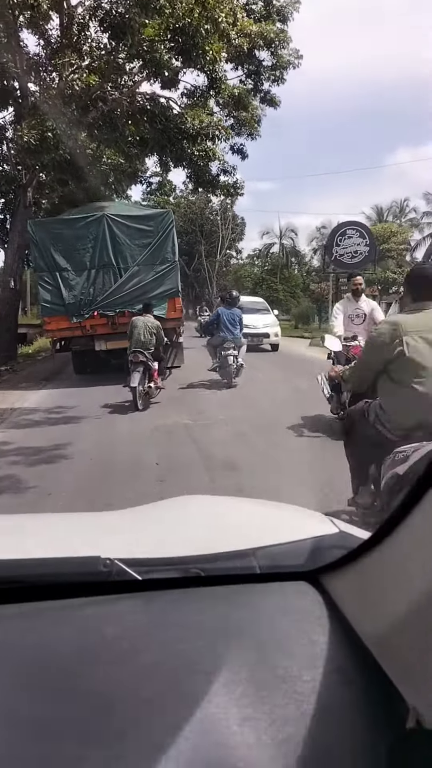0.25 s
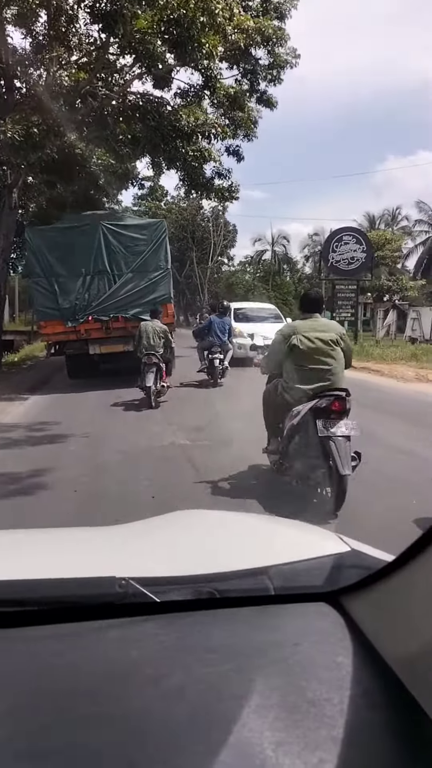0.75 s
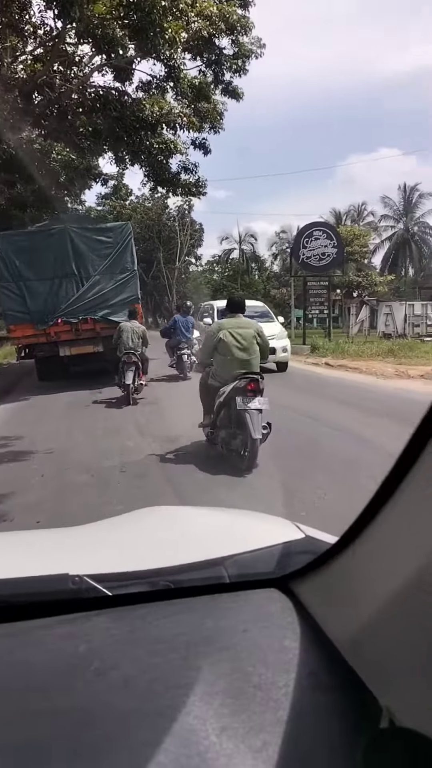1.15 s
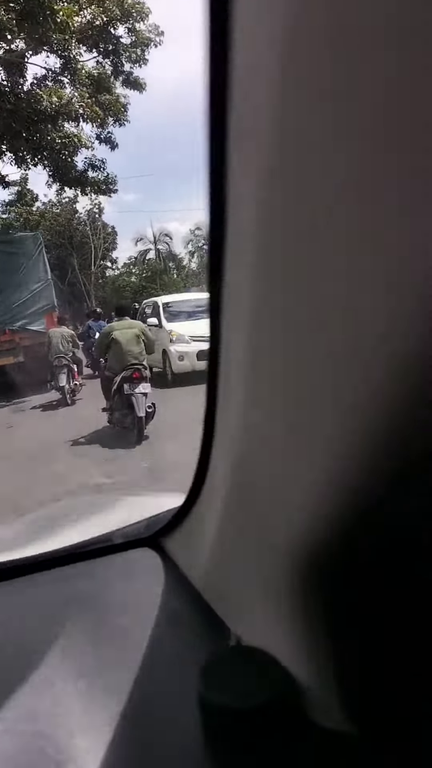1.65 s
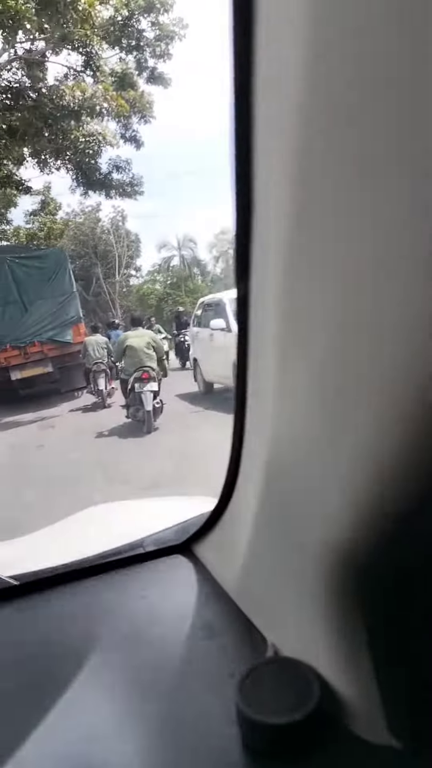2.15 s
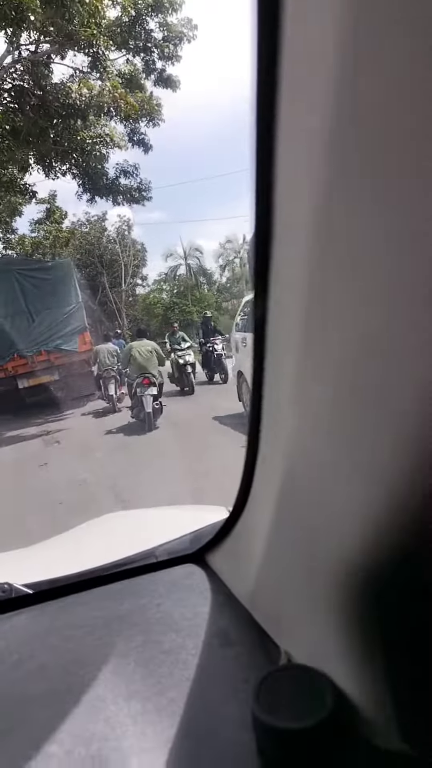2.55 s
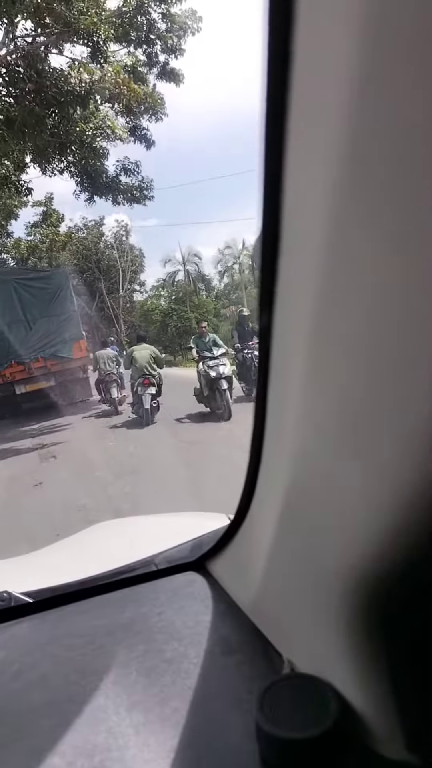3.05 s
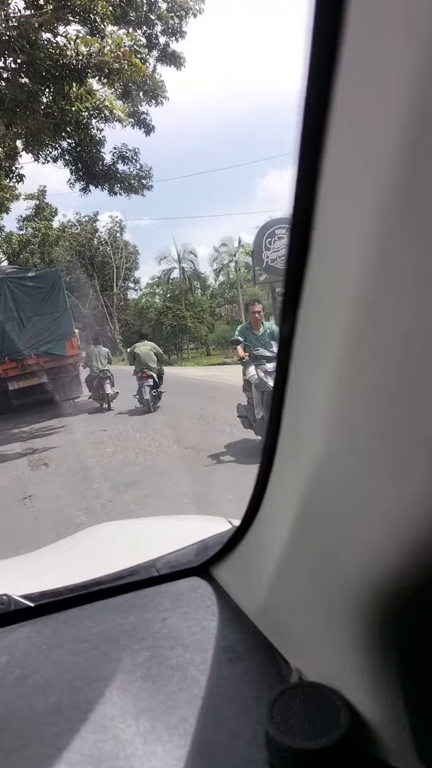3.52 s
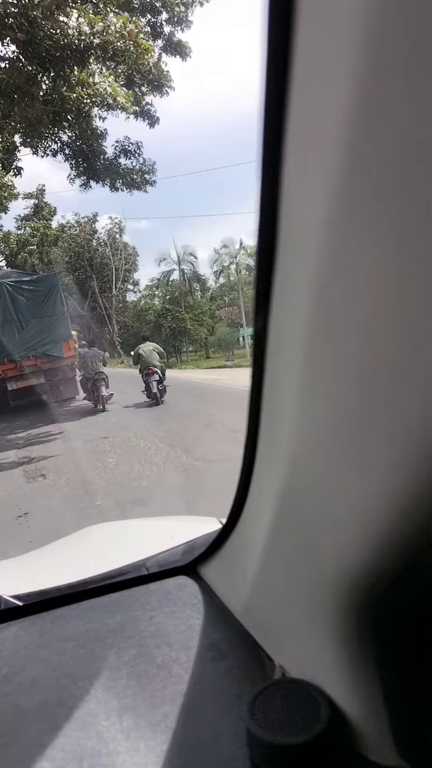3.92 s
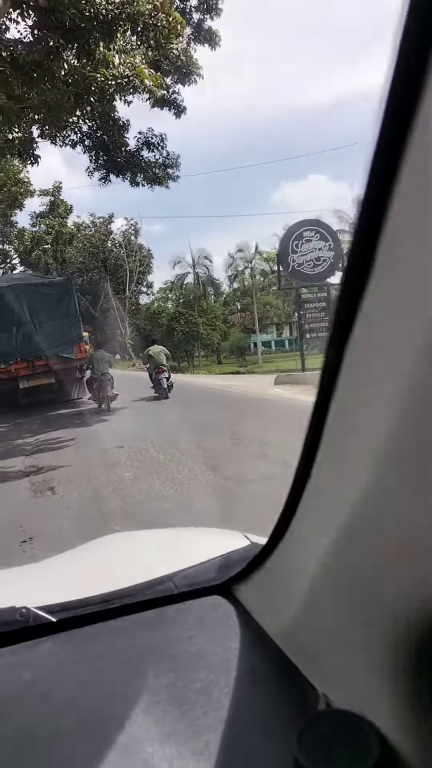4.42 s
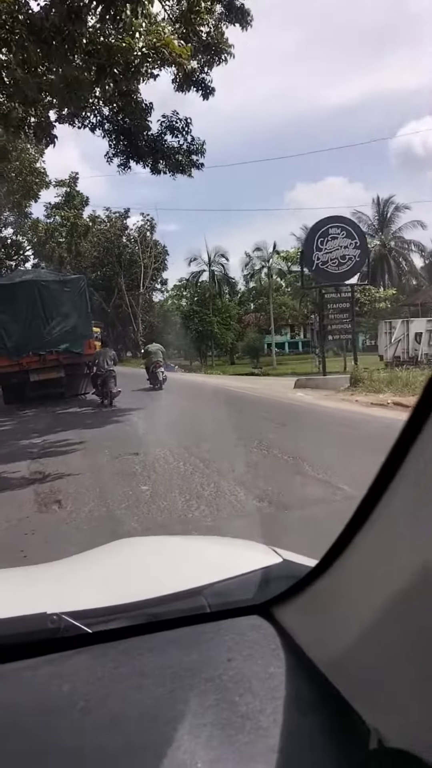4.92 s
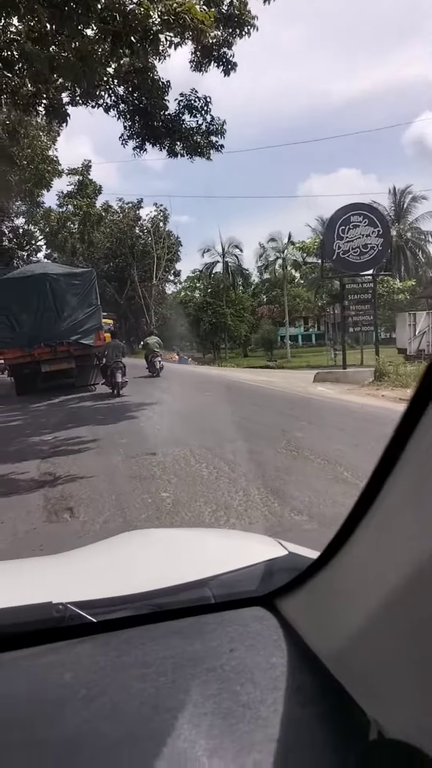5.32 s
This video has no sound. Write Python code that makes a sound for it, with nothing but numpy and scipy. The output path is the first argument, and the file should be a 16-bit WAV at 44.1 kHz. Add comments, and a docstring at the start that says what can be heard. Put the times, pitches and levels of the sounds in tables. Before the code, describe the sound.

Muffled engine throbbing and road rumble fill a car cabin, with a scooter's raspy pass and several dry plastic knocks.

```python
"""Slow traffic from the front seat of a closed car

A single-cylinder motorcycle throbs as summed firing harmonics and rasps as modes struck by each firing;
a scooter overtakes with a faster rasp. Gliding sines make brief hums and whines, filtered noise makes
rumble, tyres and vents, filtered impulses make plastic trim tick and knock close to the microphone,
and a few decaying partials make a thin metallic ring at the start."""
import sys
import numpy as np
from scipy import signal
from scipy.fft import rfft, irfft, next_fast_len
from scipy.io import wavfile
from scipy.ndimage import uniform_filter1d

SR = 44100
rng = np.random.default_rng(int(sys.argv[2]) if len(sys.argv) > 2 else 0)


def wrap_up_sound(samples):
    """Save the sound to the file named by the first command line argument, as 16-bit audio."""
    columns = np.atleast_2d(samples).T
    # keep every value between -1 and 1, then stretch to whole-number steps
    tamed = np.clip(columns, -1, 1)
    steps = np.round(tamed * 32767).astype(np.int16)
    wavfile.write(sys.argv[1], SR, steps)


N = 245637
TIME = np.arange(N) / SR


def motorcycle():
    """Periodic excitation: one firing rate drives both the low throb and the exhaust rasp."""
    # engine speed: [t/s, firing rate f/Hz]
    firing_rate = [(0.0, 17.18), (0.52, 16.82), (1.22, 23.54), (1.57, 23.98), (1.74, 23.53), (2.09, 20.39),
                   (2.44, 19.79), (2.78, 21.04), (3.13, 22.04), (3.66, 21.48), (3.83, 22.73), (4.35, 22.04),
                   (5.05, 24.83), (5.57, 26.17)]
    # resonances of the rasp: [f/Hz, width/Hz, relative level/dB]
    rasp_modes = [(1601, 86, 0.5), (2100, 400, -21), (2616, 260, 8.5), (3210, 1100, 4.5), (3780, 690, 11.5),
                  (4140, 270, 3), (4750, 250, -7), (5600, 350, -16.5), (6140, 400, -20)]
    # rasp swells: [peak t/s, level/dB, rise/(dB/s), fall/(dB/s), smooth hiss level/dB, treble edge f/Hz]
    rasp_swells = [(4.521, -49.5, 30.5, 24.5, 4, 5440), (5.2, -45.5, 33, 65.5, -6, 5820)]
    rate = curve(firing_rate)
    turns = cycles(rate, first_turn=.09)
    out = boom(rate, turns)
    for peak_s, db, rise, fall, hiss_db, top_hz in rasp_swells:
        exhaust = rasp(turns, rasp_modes, rise_s=.007, detune=.7, scatter_db=2.5,
                       puff_db=-1, hiss_db=hiss_db, top_hz=top_hz)
        out = out + swell(peak_s, db, rise, fall) * exhaust
    return out


def boom(rate, turns):
    """Fourier synthesis: firing harmonics add up to thumps that ring the cabin, under looser overtones."""
    # level of the low harmonics before standing waves lift them: [t/s, level/dB]
    boom_level = [(0, -34.5), (.9, -30.5), (1.3, -24), (1.8, -22), (2.55, -25.5), (2.9, -33), (3.12, -27),
                  (3.5, -35), (4.5, -34), (4.85, -26.5), (5.0, -35), (5.3, -30.5), (5.57, -45.5)]
    # throb as the motorcycle moves about: [t/s, cabin resonance f/Hz, smear of the thumps/rad,
    # odd harmonics level/dB, thump delay after the firing/turns, overtones relative to the boom level/dB]
    boom_shape = [(0, 156, 0.11, 7, 0.24, -35.5), (.6, 154.5, 0.12, -0.5, .24, -19.5),
                  (1.3, 153.4, 0.38, 7, .18, -16), (1.75, 161.7, 0.067, -0.5, 0.23, -18.5),
                  (1.92, 164.4, 0.11, 1, 0.13, -19), (2.3, 172, 0.38, -3, 0.41, -18),
                  (2.6, 159, 1.06, -1, 0.5, -17), (2.85, 190, 1.05, -3, 0.39, -15.5),
                  (3.08, 165, 0.1, 4, 0.22, -22), (3.5, 167.6, 0.074, -0.5, 0.28, -13),
                  (3.7, 171.6, 0.55, -10.5, 0.279, -13), (4.05, 178.6, 0.21, 4, 0.42, -15.5),
                  (4.35, 186.4, 0.43, -11, 0.21, -15), (4.8, 170.4, 0.87, 2, 0.072, -23.5),
                  (5.2, 172, 1.09, 7.5, 0.063, -16), (5.57, 173, 1.16, 0.5, 0.062, -18)]
    # silencer heard through the body: [f/Hz, level/dB]
    boom_colour = [(60, -37), (90, -22), (115, -10), (140, -1.5), (165, -2), (192, -3), (215, -14),
                   (250, -26.5), (300, -41)]
    # the same for the overtones: [f/Hz, level/dB]
    overtone_colour = [(215, -20), (245, -5), (283, -1), (328, 0.5), (370, -9.5), (440, -16), (520, -14),
                       (640, -25.5)]
    half_width_hz, resonance_db = 10.1, 5  # cabin resonance, level relative to the direct sound
    wander_rad, overtone_wander_rad, turbulence_db = .2, .4, -24

    shape = np.array(boom_shape)
    centre, smear, odd_db, lag, overtone_db = (curve(shape[:, [0, c]]) for c in range(1, 6))
    low, overtones = {}, {}
    for k in range(4, 12):
        phase, gain = harmonic(k, turns, lag, wander_rad)
        # reflections delay the harmonics unequally, which spreads each thump into a hum
        phase = phase - smear * (k - 8) ** 2
        cabin_mode = 1 + undb(resonance_db) / (1 + 1j * (k * rate - centre) / half_width_hz)
        wave = (np.exp(1j * phase) * cabin_mode).real
        low[k] = gain * undb(odd_db * (k % 2)) * wave * response(boom_colour, k * rate)
    for k in range(12, 25):
        phase, gain = harmonic(k, turns, lag, overtone_wander_rad)
        overtones[k] = gain * np.cos(phase) * response(overtone_colour, k * rate)
    # turbulent gas roughens the thumps
    turbulence = unit(resonate(resonate(rng.standard_normal(N), 150, 60), 170, 80))
    throb = stack(low) + undb(turbulence_db) * turbulence + undb(overtone_db) * stack(overtones)
    return undb(curve(boom_level)) * throb


def harmonic(k, turns, lag, wander_rad):
    """Phase delay: reflections push each harmonic about in phase and gain as its thump shifts by the lag."""
    phase = 2 * np.pi * (k * (turns % 1) - (k - 8) * lag) + wander_rad * walk(2.5)
    return phase, undb(1.2 * walk(4))


def standing_wave(k):
    """Modal gain: standing waves in the cabin lift single firing harmonics for a while."""
    # lifted harmonics: [middle t/s, half length/s, harmonic number]
    wave_places = [(.25, .4, 10), (.3, .4, 13), (1.4, .3, 12), (2.25, .4, 16), (2.75, .35, 10),
                   (2.8, .2, 12), (3.1, .7, 5), (3.7, .4, 6), (3.7, .3, 12)]
    # lift of each, in the same order: [level/dB]
    wave_lifts = [4.9, 15, 6.2, 3.5, 7.8, 11, 7.6, 7.1, 9]
    lift_db = 0
    for (s, half_s, order), db in zip(wave_places, wave_lifts):
        if order == k:
            lift_db = lift_db + db * np.exp(-((TIME - s) / half_s) ** 2)
    return undb(lift_db)


def stack(lines):
    """Superposition: harmonics summed at an even level, each lifted by the standing waves it meets."""
    return sum(standing_wave(k) * line for k, line in lines.items()) / running_rms(sum(lines.values()))


def rasp(turns, modes, rise_s, detune, scatter_db, puff_db, hiss_db, top_hz):
    """Impulsive modal excitation: each firing shakes thin metal into ragged chirps, with puff and hiss of gas."""
    age = np.arange(SR // 20) / SR
    hz, width, db = np.transpose(modes)
    chirps, puffs = np.zeros((2, N + len(age)))
    for start in np.flatnonzero(np.diff(np.floor(turns))):
        pitch, size, phase, lag = rng.standard_normal((4, len(hz)))
        # each mode starts a few milliseconds late, rises and dies
        rung = np.maximum(age - .003 * abs(lag)[:, None], 0) / rise_s
        envelope = rung ** 2 * np.exp(-2 * rung)
        chirp_hz = hz + detune * width * pitch
        waves = np.sin(2 * np.pi * (np.outer(chirp_hz, age) + phase[:, None]))
        chirps[start:start + len(age)] += undb(db + scatter_db * size) @ (envelope * waves)
        puffs[start:start + len(age)] += envelope[0] * undb(1.2 * size[0])
    gas_gain = undb(puff_db) * unit(puffs[:N]) + undb(hiss_db)
    gas = unit(body(rng.standard_normal(N), modes)) * gas_gain
    out = lowpass(unit(chirps[:N]) + gas, top_hz, order=10)
    return out / running_rms(out)


def scooter():
    """Accelerating impulse train: a faster, brighter rasp by the side window, duller once it has gone by."""
    # rasp resonances: [f/Hz, width/Hz, relative level/dB]
    rasp_modes = [(520, 200, -7), (850, 300, -10), (1340, 300, -9), (1850, 120, -3), (2350, 300, -4),
                  (2800, 400, -9), (3350, 500, -6), (3880, 160, 1), (4280, 300, 0), (4600, 250, 1),
                  (4850, 200, 0), (5400, 700, -13), (6100, 600, -22)]
    # rasp as it overtakes, then drops away: [t/s, level/dB]
    rasp_level = [(0, -88), (.8, -68), (.97, -57), (1.15, -52.5), (1.35, -46.5), (1.58, -43.5),
                  (1.8, -45.5), (1.87, -47.5), (2.0, -47), (2.1, -55.5), (2.5, -62.5), (3.0, -91.5),
                  (5.57, -110)]
    start_hz, gain_hz_per_s = 20.2, 6.85  # firing rate rises evenly
    gone_s, turn_s, dull_hz = 1.89, .034, 4330
    turns = cycles(start_hz + gain_hz_per_s * TIME, first_turn=.27)
    exhaust = rasp(turns, rasp_modes, rise_s=.0085, detune=.7, scatter_db=4,
                   puff_db=-5, hiss_db=-8, top_hz=5300)
    gone = (1 + np.tanh((TIME - gone_s) / turn_s)) / 2
    heard = (1 - gone) * exhaust + gone * lowpass(exhaust, dull_hz, order=10)
    return undb(curve(rasp_level)) * heard


def passing_tones():
    """Frequency modulation: hums and thin whines from the traffic swell, glide and waver a little."""
    # [middle t/s, half length/s, f/Hz, glide/(Hz/s), level/dB, flutter/dB]
    tones = [(2.13, .15, 157, -15, -34, 1), (2.15, .17, 176, -15, -34, 1), (2.25, .17, 238, -20, -43, 2),
             (2.2, .12, 253, -20, -45, 2), (1.5, .17, 503, 15, -51, 2), (3.8, .12, 277, 30, -46, 1),
             (4.3, .16, 139, 0, -42, 1), (4.32, .14, 186, 0, -40, 1), (5.02, .13, 315, 40, -39, 1),
             (5.04, .14, 293, 45, -43, 1), (4.95, .06, 335, 20, -41, 1), (5.1, .22, 140, 0, -42, 2),
             (5.25, .45, 1583, 20, -65, 3), (5.53, .12, 1595, 0, -61.5, 2), (1.94, .12, 3860, 0, -55, 4),
             (1.92, .25, 1860, -20, -66.5, 4), (1.25, .18, 1880, 0, -66, 5), (1.58, .045, 1790, 0, -54, 3)]
    out = np.zeros(N)
    for middle_s, half_s, hz, glide, db, flutter_db in tones:
        pitch = hz * (1 + .0019 * walk(26)) + glide * (TIME - middle_s)
        tone = unit(np.sin(2 * np.pi * np.cumsum(pitch) / SR))
        envelope = np.exp(-((TIME - middle_s) / half_s) ** 2)
        out += undb(db + flutter_db * walk(30)) * envelope * tone
    return out


def trim():
    """Impulse response: slipping plastic gives a short tick and a damped panel knock, with a faint cabin tail."""
    # [t/s, tick peak level/dB, knock peak level/dB, tick treble edge f/Hz, lowest panel mode f/Hz]
    clicks = [(0.666, -38, -30, 2010, 474), (1.369, -37, -33, 1590, 700), (1.372, -28, -26, 1800, 560),
              (1.376, -34, -34, 1500, 900), (1.38, -29, -20.5, 1700, 480), (1.385, -40, -32, 1500, 520),
              (1.497, -28, -52, 6900, 445), (1.529, -27, -30, 6000, 445), (1.5532, -26, -57, 8000, 445),
              (1.667, -15.5, -23, 4840, 445), (1.983, -13.5, -22.5, 4360, 730),
              (2.185, -39.5, -41.5, 5450, 445), (2.369, -36.5, -35, 2020, 445),
              (2.509, -26, -26, 4300, 445), (2.544, -15, -17, 2980, 445), (2.546, -4, -7, 2780, 447),
              (2.709, -28, -39, 4350, 445), (3.43, -27.5, -42, 6020, 3670), (3.434, -27.5, -42, 6070, 3670),
              (4.5945, -4.5, -31, 4650, 690), (5.253, -33, -31.5, 3000, 445)]
    # panel modes, scaled in pitch to the size of each panel: [f/Hz, width/Hz, relative level/dB]
    knock_modes = [(445, 270, 1), (620, 57, -6.5), (1040, 240, -32)]
    # modes of the tick: [f/Hz, width/Hz, relative level/dB]
    tick_modes = [(1150, 980, 1), (2750, 1300, 4), (3770, 530, 6.5), (5220, 600, -44.5), (10700, 1500, -13)]
    out, size = np.zeros(N), SR // 20
    blow = signal.unit_impulse(size)
    for s, tick_db, knock_db, bright_hz, panel_hz in clicks:
        tick = lowpass(body(blow, tick_modes), bright_hz, order=3)
        ratio = panel_hz / knock_modes[0][0]
        knock = lowpass(body(blow, np.array(knock_modes) * [ratio, ratio, 1]), 1100 * ratio)
        start = int(s * SR)
        out[start:start + size] += undb(tick_db) * tick / abs(tick).max()
        out[start:start + size] += undb(knock_db) * knock / abs(knock).max()
    # the tail decays at 60 dB in 0.06 s
    tail = rng.standard_normal(size) * undb(-60 * np.arange(size) / SR / .06)
    return out + undb(-20) * signal.fftconvolve(out, tail / np.linalg.norm(tail))[:N]


def ring():
    """Inharmonic partials: a thin, fluttering metallic squeal whose partials stop one after another."""
    # [f/Hz, level/dB, length/s]
    ring_partials = [(2772, -44, .09), (2674, -50.5, .125), (3575, -49.5, .045), (3690, -55, .1),
                     (4075, -51.5, .115), (6480, -71, .08)]
    out = np.zeros(N)
    for hz, db, length_s in ring_partials:
        tone = np.sin(2 * np.pi * hz * TIME + .6 * walk(200))
        out += undb(db + 4 * walk(110)) * tone * np.exp(-(TIME / length_s) ** 5)
    return out


def cabin():
    """Broadband noise: body rumble and tyre noise swell with passing traffic over the steady vent hiss."""
    # swells of the tyre noise: [peak t/s, level/dB, rise/(dB/s), fall/(dB/s)]
    passes = [(1.4, -39, 25, 23), (3.3, -56.5, 32.5, 25.5), (4.7, -44.5, 11, 11.5)]
    # relative spectral densities of tyres, rumble and vents: [f/Hz, level per Hz/dB]
    road_colour = [(150, 7.5), (280, 1.5), (380, -2), (520, -10), (750, -11.5), (1200, -15.5), (1600, -20),
                   (2100, -25.5), (4000, -16.5)]
    rumble_colour = [(12, -36.5), (26, -4), (36, -10.5), (55, -6.5), (90, -5.5), (130, 2.5), (190, -2.5),
                     (260, -9), (450, -39)]
    vent_colour = [(800, 0.5), (1500, -7.5), (2000, -37.5), (2700, -11), (3300, -8.5), (3950, 1.5),
                   (4400, -4.5), (5000, -14.5), (6000, -20), (7000, -36), (9000, -45.5), (14000, -45)]
    tyres_db, rumble_db, vents_db = -47, -39, -59  # levels between swells
    rumble_follows = .42  # share of each swell, in dB, that the body rumble takes up
    traffic = np.sqrt(undb(tyres_db) ** 2 + sum(swell(*row) ** 2 for row in passes))
    shake = undb(rumble_db) * (traffic / undb(tyres_db)) ** rumble_follows
    rumble = shake * restless_noise(rumble_colour, flicker_db=1.5, rate=5.3)
    tyres = traffic * restless_noise(road_colour, flicker_db=.7, rate=14)
    vents = undb(vents_db) * restless_noise(vent_colour, flicker_db=.8, rate=18)
    return rumble + tyres + vents


def restless_noise(colour, flicker_db, rate):
    """Spectral shaping: noise of a given spectrum whose overlapping octave bands flicker on their own."""
    size = next_fast_len(N, True)
    freq = np.maximum(np.fft.rfftfreq(size, 1 / SR), 1)
    octave = np.log2(freq)
    spectrum = rfft(rng.standard_normal(size)) * response(colour, freq)
    out = np.zeros(N)
    for centre in range(int(np.log2(colour[0][0])), int(np.log2(colour[-1][0])) + 2):
        band = irfft(spectrum * np.maximum(1 - abs(octave - centre), 0), size)[:N]
        out += band * undb(flicker_db * walk(rate))
    return unit(out)


def swell(peak_s, db, rise_db_per_s, fall_db_per_s):
    """Exponential growth and decay: gain climbs to a rounded peak and falls away again."""
    round_s = .056  # how rounded the top is
    slope = np.where(TIME < peak_s, rise_db_per_s, fall_db_per_s)
    return undb(db - slope * (np.hypot(TIME - peak_s, round_s) - round_s))


def cycles(rate, first_turn):
    """Phase integral of frequency: engine cycles counted from the first firing."""
    return np.cumsum(rate) / SR - first_turn


def response(colour, freq):
    """Frequency response: gain of a [f/Hz, level/dB] table at given frequencies, -90 dB outside it."""
    hz, db = np.transpose(colour)
    return undb(np.interp(np.log(freq), np.log(hz), db, left=-90, right=-90))


def resonate(x, hz, width):
    """Damped oscillator: one resonance, gain 1 at its centre."""
    return signal.lfilter(*signal.iirpeak(min(hz, .45 * SR), hz / width, fs=SR), x)


def body(x, modes):
    """Modal superposition: a set of resonances driven together."""
    return sum(undb(db) * resonate(x, hz, width) for hz, width, db in modes)


def lowpass(x, hz, order=2):
    """Low-pass filtering: smooth treble roll-off."""
    return signal.sosfilt(signal.butter(order, min(hz, .45 * SR), fs=SR, output="sos"), x)


def walk(rate):
    """Band-limited randomness: smooth wander with a spread near 1, drawn anew rate times a second."""
    k = int(SR / rate)
    steps = np.repeat(rng.standard_normal(N // k + 1), k)
    return 1.3 * uniform_filter1d(uniform_filter1d(steps, k), k)[:N]


def curve(rows):
    """Linear interpolation: a [t/s, value] table joined by straight lines."""
    return np.interp(TIME, *np.transpose(rows))


def running_rms(x):
    """Short-time mean power: rms level smoothed twice over a sixth of a second."""
    return np.sqrt(uniform_filter1d(uniform_filter1d(x ** 2, SR // 6), SR // 6))


def unit(x):
    """Power normalisation: scale to rms 1."""
    return x / np.sqrt(np.mean(x ** 2))


def undb(db):
    """Logarithmic level: decibels to amplitude gain."""
    return 10 ** (np.asarray(db) / 20)


def scene():
    """Linear superposition: everything as it reaches the front seat."""
    return (motorcycle() + scooter() + passing_tones() + cabin() + trim() + ring())[None]


def record(dry):
    """Transducer response: the microphone has a dip in the high treble and cuts the top."""
    coloured = dry - .67 * resonate(dry, 8700, 2300)
    return signal.sosfilt(signal.ellip(8, .2, 70, 14600, fs=SR, output="sos"), coloured)


dry = scene()
out = record(dry)
wrap_up_sound(out)
```